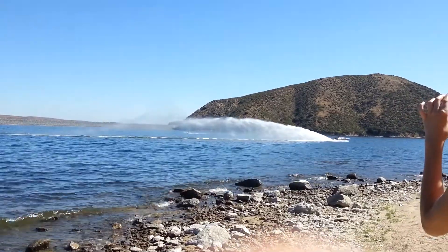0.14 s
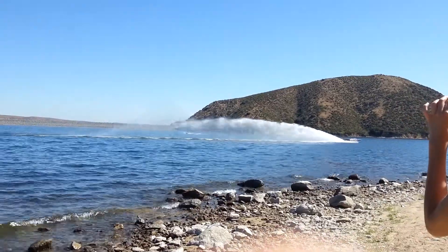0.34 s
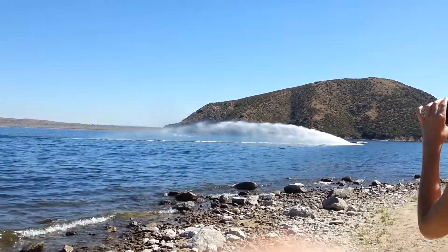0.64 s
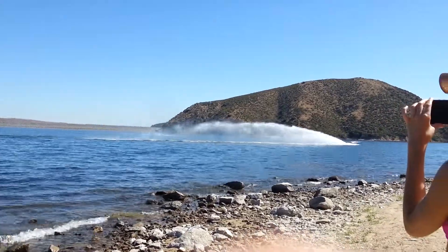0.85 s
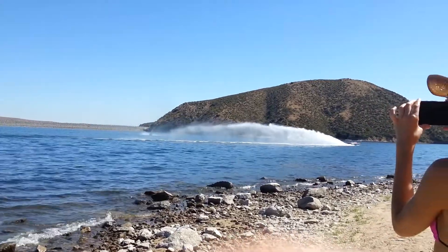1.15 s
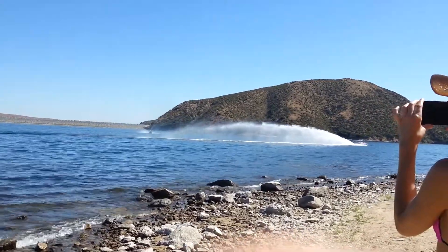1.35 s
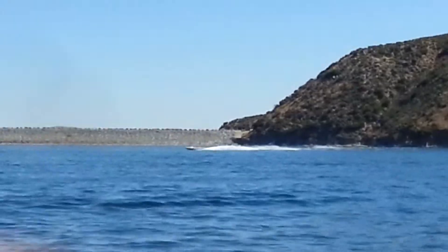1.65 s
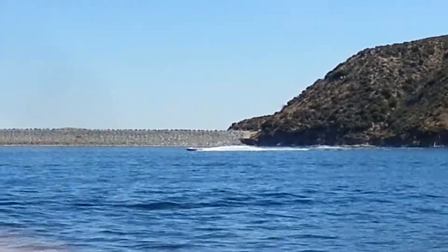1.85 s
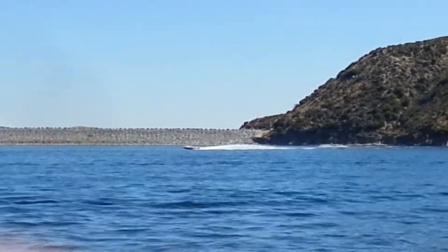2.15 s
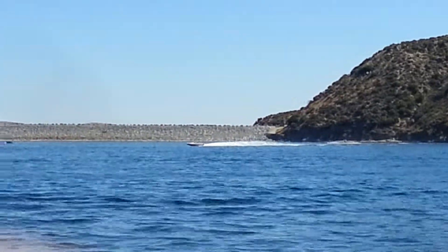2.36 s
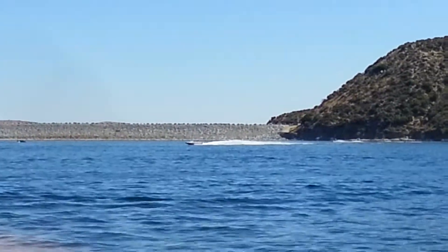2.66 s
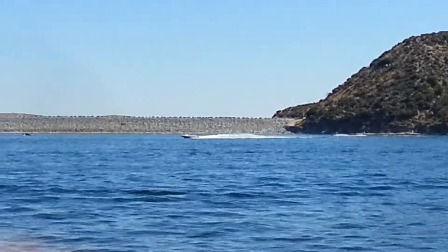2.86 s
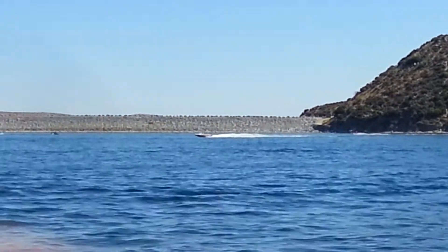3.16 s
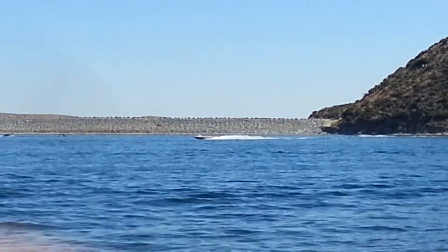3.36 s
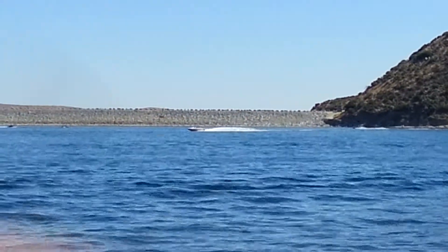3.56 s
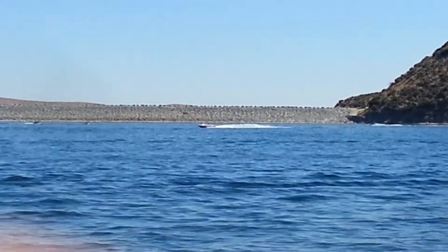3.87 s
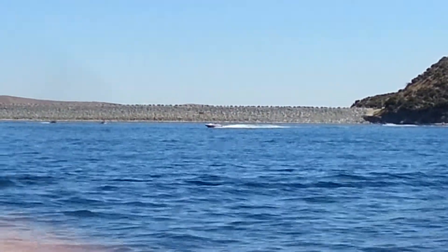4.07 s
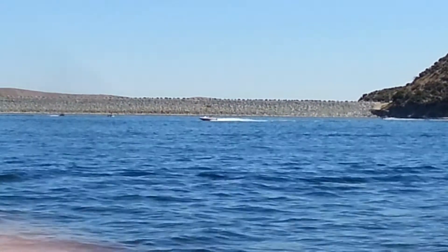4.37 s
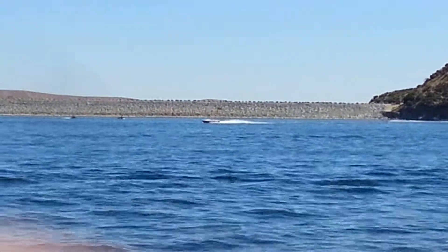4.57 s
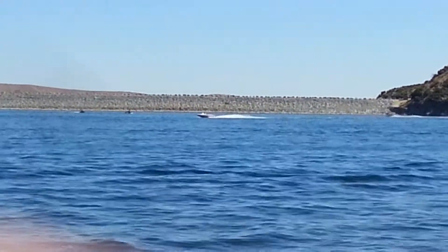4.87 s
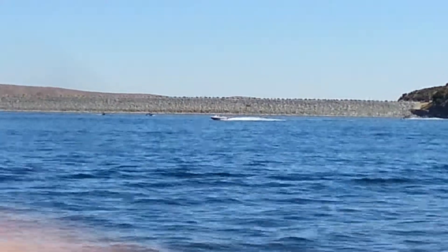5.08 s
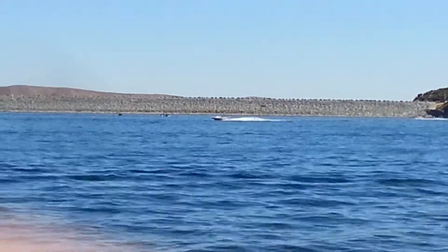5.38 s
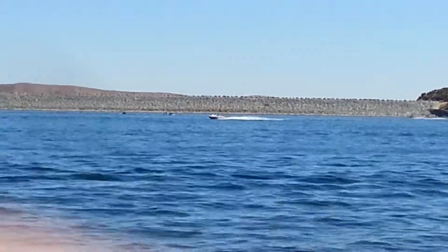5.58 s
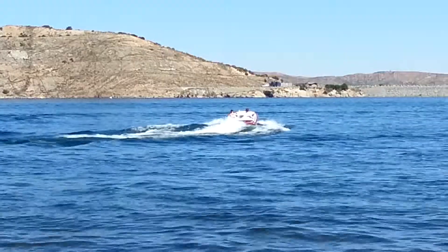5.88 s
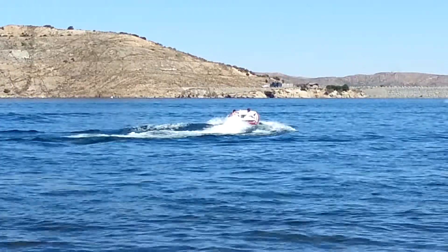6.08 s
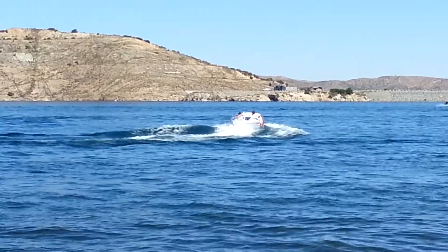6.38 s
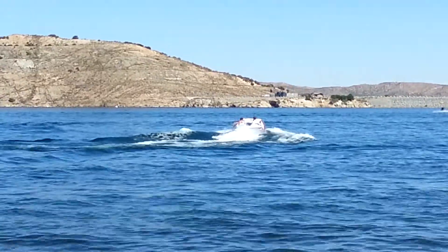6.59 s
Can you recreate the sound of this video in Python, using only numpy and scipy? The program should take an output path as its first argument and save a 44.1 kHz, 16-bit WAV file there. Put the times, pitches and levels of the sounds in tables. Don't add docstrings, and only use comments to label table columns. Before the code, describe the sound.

Outdoors on a pebbly lake shore, a V8 jet boat turns close by with a loud, steady, wavering drone, rushing water and short rasps. A hard cut drops to a much quieter distant run that throttles back and fades beneath small wavelets, drips and another engine idling. Another cut brings back a loud, lower, pulsing engine nearby. Stereo handheld microphone, treble slightly thinned.

```python
import sys
import numpy as np
from scipy import signal
from scipy.fft import rfft, irfft, next_fast_len
from scipy.io import wavfile
from scipy.ndimage import uniform_filter1d, map_coordinates

SR = 44100
rng = np.random.default_rng(int(sys.argv[2]) if len(sys.argv) > 2 else 0)


def digitize_waveform(pressure):
    field = np.atleast_2d(pressure).T
    bounded = np.clip(field, -1, 1)
    quanta = np.round(bounded * 32767).astype(np.int16)
    wavfile.write(sys.argv[1], SR, quanta)


def voltage_ratio(level):
    return 10 ** (np.asarray(level, float) / 20)


N = 296793

CUTS = [0, 1.5037, 5.7272, 7]

# time_s, cycle_hz
TURN_SPEED = [
    (0, 34.32),
    (.2, 34.075),
    (.45, 33.91),
    (.75, 33.855),
    (1.2, 33.815),
    (1.51, 33.69),
]
# time_s, thump_db, drone_db
TURN_LEVELS = [
    (0.02, -10, -20),
    (0.334, -10, -17),
    (0.432, -14, -14),
    (0.87, -11, -16),
    (1.076, -13.5, -15.5),
    (1.132, -12.5, -16.5),
    (1.48, -13, -15),
    (1.49, -14, -13.5),
]
# time_s, cycle_hz, level_db
AWAY_RUN = [
    (1.5, 36.46, -34.5),
    (3.379, 36.73, -35.5),
    (3.501, 33.68, -33.5),
    (3.638, 28.92, -34),
    (4.05, 29.22, -33),
    (4.52, 29.38, -34),
    (4.6, 34.15, -32),
    (4.72, 41, -50),
    (4.85, 38.7, -66),
    (5.8, 42.8, -75),
]
# time_s, cycle_hz
NEAR_SPEED = [
    (5.727, 29.27),
    (5.95, 29.235),
    (6.2, 29.31),
    (6.45, 29.55),
    (6.73, 30.05),
]
TURN_BARK_DB = -33.5
NEAR_DB = -17, -11.5, -26
AWAY_THUMP_DB, POWER_DB, POWER_OFF_S = -2, 11.5, 3.49

# order_of_cycle_rate, level_db
TURN_ORDERS = [(1, -56), (2, -47), (3, -28), (4, -25), (5, 0), (6, -8), (7, -8), (8, -18), (9, -14),
               (10, -17), (11, -18), (12, -25), (13, -23), (14, -27), (15, -34), (16, -40), (17, -31),
               (18, -32), (19, -33), (20, -37), (21, -32), (22, -28), (23, -33), (24, -29), (25, -32),
               (26, -30), (27, -29), (28, -34), (29, -33), (30, -36), (31, -34), (32, -39), (33, -34)]
AWAY_ORDERS = [(1, -53), (2, -31), (3, -18), (4, -22), (5, 0), (6, -13), (7, -18), (8, -14), (9, -22),
               (10, -23), (11, -25), (12, -29), (13, -28), (14, -28), (15, -33), (16, -30), (17, -32),
               (18, -33)]
NEAR_ORDERS = [(1, -49), (2, -44), (3, -34), (4, -28), (5, -11), (6, -6), (7, -16), (8, 0), (9, -12),
               (10, -15), (11, -18), (12, -21), (13, -18), (14, -22), (15, -27), (16, -25), (17, -33),
               (18, -31), (19, -36), (20, -22), (21, -20), (22, -22), (23, -22), (24, -28), (25, -30),
               (26, -33), (27, -27), (28, -23), (29, -32), (30, -32), (31, -30), (32, -34), (33, -48)]
IDLE_ORDERS = [(1, -39), (2, -37), (3, -33), (4, -10), (5, -5), (6, -15), (7, -10), (8, -1), (9, -4),
               (10, -7), (11, -3), (12, -2), (13, -11), (14, -11), (15, -14), (16, -11)]
BARK_FROM = 15
# order_of_cycle_rate, change_db
COASTING = [(3, -4), (6, -1.5), (7, -5), (8, -1.5), (11, 6.5), (12, 5), (16, 3.5), (18, 10.5)]
# order_of_cycle_rate, change_db
CLOSING = [(14, 4), (17, -9), (19, 14), (24, 3), (25, 2), (26, 4), (27, 7), (29, -6), (30, -3), (33, -2)]
DULLING_DB = [2, 0, 2]

TURN_FIRING = [
    [(0.04, 0.86), (0.083, 0.86), (0.369, 0.41), (0.497, 1.0), (0.629, 0.94), (0.682, 0.55), (0.938, 0.7),
     (0.945, 0.29)],
    [(0.125, 0.95), (0.146, 0.76), (0.737, 1.0), (0.758, 0.87)],
]
AWAY_FIRING = [
    [(0.169, 0.56), (0.223, 0.77), (0.421, 1.0), (0.546, 0.4), (0.739, 0.35), (0.791, 0.65), (0.891, 0.54),
     (0.98, 0.95)],
    [(.42, 1), (.98, .9)],
]
NEAR_FIRING = [
    [(0.086, 0.51), (0.233, 0.5), (0.492, 0.57), (0.57, 0.92), (0.716, 0.99), (0.801, 0.41), (0.867, 0.76),
     (0.913, 1.0)],
    [(0.109, 0.92), (0.544, 1.0), (0.575, 0.56), (0.679, 0.68)],
]
IDLE_FIRING = [
    [(0, 1), (.3, .7), (.55, .9), (.8, .6)],
    [(0, 1)],
]
TURN_PUFFS = [(.10, 1), (.47, 0.5), (.6, .7), (.7, 0.8), (.8, 0.4), (.9, 1)]
NEAR_PUFFS = [(.01, .6), (.16, .75), (.27, 0.86), (.41, 0.66), (.535, 1), (.69, 0.17), (.9, 0.46)]

# start_level_db, slope_db_per_s
RUSH = [
    [(-21.5, -2.5), (-32, -0.5), (-46, 2)],
    [(-32, 0), (-39, 0), (-49, -0.5)],
    [(-26, 1), (-33.5, -0.5), (-46, -2)],
]
# freq_hz, level_db
TURN_ROAR = [(25, -70), (45, -35.1), (80, -13.7), (120, -12.4), (170, -5.4), (240, -0.1), (340, -8.6),
             (470, -14), (545, -22), (620, -17), (700, -15.9), (900, -15.5), (1200, -19.7), (1600, -23.0),
             (2400, -70), (4000, -120)]
AWAY_ROAR = [(25, -73), (45, -77), (80, -14.5), (120, -17), (170, -2), (240, -7.5), (340, -11),
             (480, -13.5), (560, -13.5), (700, -13), (900, -12.5), (1200, -15), (1600, -22), (2400, -75),
             (4000, -120)]
NEAR_ROAR = [(25, -70), (45, -40.3), (80, -24.4), (120, -13.6), (170, -5.9), (240, -0.9), (340, -8.7),
             (480, -13.8), (560, -11.6), (700, -13.5), (900, -20.5), (1200, -26.8), (1600, -25.5),
             (2400, -70), (4000, -120)]
# freq_hz, level_db
SPRAY = [
    [(710, -47), (1200, -7.5), (1340, -14.5), (1910, -10.5), (2190, -11), (2650, -12), (3050, -10),
     (3320, -11), (4470, -14), (6500, -30), (8450, -63), (14300, -120)],
    [(710, -46), (1200, -5.5), (1760, -4), (2760, -7), (3610, -9.5), (4410, -8.5), (5520, -19.5),
     (6500, -23), (8450, -75), (14300, -120)],
    [(710, -17), (1200, -5), (1300, -28), (1370, -3.5), (1530, -12.5), (1940, -3), (2380, -9.5), (2570, -3),
     (2940, -13), (3210, -2), (3490, -13), (3910, -6), (6500, -27), (8450, -41), (14300, -120)],
]
# freq_hz, level_db
FIZZ = [
    [(3240, -37.5), (5500, -7.5), (6380, -5), (9550, -9), (14400, -25.5)],
    [(3240, -44), (5500, -6.5), (7000, 3), (12300, -2), (13900, -4.5), (14600, -10)],
    [(3240, -32), (5500, -9.5), (8160, -9), (9280, -13), (10100, -15), (10900, -15), (14400, -26.5)],
]
# time_s, level_db, half_length_s, pitch_hz, width_hz
RASP = [
    [(.03, -35.5, 0.055, 1370, 150), (.2, -44, .08, 1160, 70), (.385, -30.5, 0.04, 745, 35),
     (.42, -40.5, 0.17, 3020, 220), (.56, -36, .09, 790, 90), (.8, -39, 0.087, 910, 60),
     (1.17, -30, 0.067, 915, 50), (1.2, -37, .04, 650, 60), (.15, -44, .07, 930, 60),
     (.9, -40, 0.073, 2950, 250), (1.25, -42, 0.14, 3000, 250), (1.42, -32.5, 0.13, 814, 80)],
    [(2.17, -46, 0.074, 850, 34), (1.45, -37, 1, 750, 26), (3.15, -38, 0.054, 730, 60),
     (4, -40, 0.74, 770, 45), (2.4, -41, 0.023, 2650, 200), (2.7, -42, 0.031, 2550, 250),
     (2.75, -51, 0.22, 2700, 69), (2.55, -52, .35, 4400, 120), (3.17, -49, .06, 4450, 150)],
    [(5.93, -36.5, 0.1, 1960, 220), (6.07, -34, 0.04, 1950, 150), (6.27, -44, 0.053, 3180, 90),
     (6.35, -51, 0.04, 2620, 120), (6.48, -39.5, 0.08, 1780, 90), (6.5, -39.5, .06, 2130, 90),
     (6.63, -34.5, 0.055, 2090, 180), (6.695, -30, 0.028, 1930, 250), (6.72, -35, 0.03, 3280, 100),
     (6.46, -45, .06, 3130, 90), (6.62, -39, .08, 3160, 100), (6.67, -38, .05, 2650, 200),
     (6.5, -32.5, 0.27, 680, 140), (6.7, -37, 0.15, 2480, 800)],
]
SPRAY_BEAT = 0.42
SPRAY_AIM_DB = 1.5

# freq_hz, likeness_0_to_1
ALIKE = [
    [(130, 0.97), (300, 0.97), (620, 0.75), (850, .8), (1200, .6), (1700, 0.2), (2400, .45), (4700, 0.33),
     (8000, 0.1)],
    [(130, 1), (300, .97), (600, 0.82), (1200, 0.6), (2400, 0.62), (3400, .4), (6000, .17), (9000, 0.03)],
    [(130, .998), (300, 0.95), (620, 0.6), (1200, .25), (2400, 0.88), (4700, .7), (9000, .2), (14000, .1)],
]
LEFT_LATE = [-0.000067, 0.00034, .00001]
# freq_hz, left_minus_right_db
LEAN = [
    [(600, 1), (1700, -2), (2400, 1.5), (3400, 1.5), (6800, 0), (12000, -9)],
    [(600, -0.5), (1200, 1), (2400, 4), (3400, 0.5), (6800, -4), (9500, -8), (12500, 0)],
    [(600, 1.5), (1200, -1.5), (2400, -2.5), (4700, -0.5), (6800, -4.5), (12500, -0.5)],
]
# left_minus_right_db, left_late_s
EXHAUST_SIDE = [
    (.3, -.00006),
    (-.2, .00012),
    (0, .00005),
]
# freq_hz, left_minus_right_db
PORTS = [(60, -0.5), (130, 0), (280, 0.64), (620, 0), (14000, 1)]

# time_s, peak_db, pitch_hz, left_minus_right_db
TICKS = [(0.0442, -25, 9300, -4), (.2663, -39, 7000, -3), (.9428, -29, 6000, -3), (1.3952, -38, 6840, -1),
         (5.7902, -35, 6690, -2), (1.5030, -33, 9500, 0), (1.5499, -35, 6370, -9), (1.7993, -34.5, 5810, 0),
         (4.4862, -33, 5200, -6), (5.0828, -32, 7700, -9.5), (6.0621, -42, 6120, -4),
         (6.1449, -30, 7860, -5)]
# time_s, peak_db, pitch_hz, left_minus_right_db
DRIPS = [
    (1.690, -30, 2800, 11),
    (2.486, -27, 3340, 7),
    (3.142, -25, 4460, 0),
    (3.178, -35, 4350, 0),
    (3.170, -27, 4800, -6),
    (3.543, -28, 2500, 1.5),
    (4.428, -24.5, 2670, 1.5),
    (4.499, -34, 2507, 0),
    (4.56, -31, 1310, 5.5),
    (4.585, -30, 1320, 7),
]
# time_s, level_db
WASH = [
    (1.52, -44),
    (1.59, -50.5),
    (2.06, -50.5),
    (2.24, -46.5),
    (3.2, -46.5),
    (3.23, -49),
    (3.95, -47),
    (4.24, -53.5),
    (4.67, -44.5),
    (5.71, -41.5),
]
WASH_GROWS = 0.13, 0.52, 0.61

# time_s, level_db
IDLE = [
    (1.5, -36),
    (2.3, -35.5),
    (4.1, -41.5),
    (4.7, -34.5),
    (5.8, -35),
]
# time_s, level_db, half_length_s
HUM = [
    (1.85, -37, 0.16),
    (3.4, -35, 0.067),
    (3.62, -35, 0.14),
    (4.2, -33.5, 0.096),
    (4.5, -37, 0.06),
    (5.1, -48, 0.23),
    (5.6, -32, 0.16),
]
IDLE_HZ, IDLE_THUMP_DB, IDLE_BARK_DB = 21.5, -10.5, -13.5
HUM_HZ, HUM_DB = 264, -46.5

# freq_hz, floor_db
GATE = [(7500, -120), (9000, -92), (11000, -86.5), (14500, -89)]
GATE_FOLLOWS, GATE_REST_DB = .8, -24
GATE_SCATTER_DB = 5.5

EAR = np.array([[.5], [-.5]])


def unit(x):
    return x / np.sqrt(np.mean(x ** 2) + 1e-20)


def along(points, hz):
    f, v = np.transpose(points)
    return np.interp(np.log(hz + 1), np.log(f + 1), v)


def curves(rows):
    s, *cols = np.transpose(rows)
    return [np.interp(np.arange(N) / SR, s, c) for c in cols]


def steady(*levels_db):
    return [np.full(N, float(db)) for db in levels_db]


def wobble(rate, size=N):
    knots = rng.standard_normal(int(size * rate / SR) + 4)
    return map_coordinates(knots, [np.arange(size) * rate / SR])


def swells(rows):
    t = np.arange(N) / SR
    return np.sqrt(sum(voltage_ratio(db) ** 2 * np.exp(-((t - s) / length) ** 2) for s, db, length in rows))


def filtered(x, response):
    m = next_fast_len(N + 8192)
    return irfft(rfft(x, m) * response(np.fft.rfftfreq(m, 1 / SR)), m)[..., :N]


def smooth_patches(shape, bins, frames):
    field = uniform_filter1d(rng.standard_normal(shape), bins, axis=0)
    return unit(uniform_filter1d(field, frames, axis=1))


def view(index):
    return slice(round(CUTS[index] * SR), min(N, round(CUTS[index + 1] * SR)))


def exhaust(index, run, orders, firing, count, rough, flutter, coasting=(), shift=0):
    span = view(index)
    hz, *levels_db = (c[span] for c in run)
    size = len(hz)
    cycle = 2 * np.pi * np.cumsum(hz) / SR
    swing = DULLING_DB[index] * (np.arange(size) - size / 2) / SR
    layers = np.zeros((3, size))
    change_db = {round(k): db for k, db in coasting}
    for k, db in orders:
        db = db + change_db.get(k, 0) * shift
        place, strength = np.transpose(firing[int(k >= BARK_FROM)])
        pulses = 1j * np.sum(strength * np.exp(-2j * np.pi * k * place))
        shake = rough * np.minimum((k / 5) ** 2.0, 3)
        drift = wobble(flutter, size) + 1j * wobble(flutter, size)
        tone = np.real((1 + shake * drift) * np.exp(1j * (k * cycle + np.angle(pulses))))
        if count < k < BARK_FROM:
            db = db - swing * np.clip(k - 8, -1.5, 3)
        layers[int(k > count) + int(k >= BARK_FROM)] += voltage_ratio(db) * tone
    throb = np.zeros(size)
    for pulses in firing[2:] or firing:
        for place, strength in pulses:
            throb += strength ** 2 * np.exp(30 * (np.cos(cycle - 2 * np.pi * place + .1) - 1))
    sound = sum(voltage_ratio(db) * unit(x) for db, x in zip(levels_db, layers))
    return sound, throb / throb.mean()


def rush(spectrum, index, patchy_db):
    z = signal.stft(rng.standard_normal((2, N)), nperseg=512)[2]
    gain = voltage_ratio(patchy_db * smooth_patches(z.shape[1:], bins=5, frames=8))
    pair = signal.istft(z * gain, nperseg=512)[1][:, :N]

    def colour(hz):
        turn = np.arccos(np.clip(along(ALIKE[index], hz), -1, 1)) / 2
        return voltage_ratio(along(spectrum, hz)) * [np.cos(turn), np.sin(turn)]

    def bearing(hz):
        late = np.exp(-2j * np.pi * hz * LEFT_LATE[index] * EAR)
        return late * voltage_ratio(along(LEAN[index], hz) * EAR * 1)

    mid, side = filtered(pair, colour)
    return unit(filtered(np.array([mid + side, mid - side]), bearing))


def rasp(index):
    band = [(300, -120), (500, 0), (4500, 0), (6000, -120)]
    hz, t, z = signal.stft(rush(band, index, patchy_db=2.5), SR, nperseg=1024)
    power = 0
    for s, db, length, centre, width in RASP[index]:
        resonance = np.exp(-((hz - centre) / width) ** 2) * 2300 / width
        power = power + voltage_ratio(db) ** 2 * np.outer(resonance, np.exp(-((t - s) / length) ** 2))
    return signal.istft(z * np.sqrt(power), SR, nperseg=1024)[1][:, :N]


def boat(index, engine, beat, patchy_db):
    sound, throb = engine
    span = view(index)
    wash_db = curves(WASH)[0][span]
    wash_db = (wash_db - wash_db.mean()) * (index == 1)
    since = np.arange(len(sound)) / SR
    roar_db, spray_db, fizz_db = (db + slope * since + grows * wash_db
                                  for (db, slope), grows in zip(RUSH[index], WASH_GROWS))
    aim = swells([row[:3] for row in RASP[index]])[span]
    spray_db = spray_db + SPRAY_AIM_DB * aim / aim.max()

    pan_db, late = EXHAUST_SIDE[index]
    sound = voltage_ratio(pan_db * EAR) * (sound - EAR * late * SR * np.gradient(sound))

    gate = np.sqrt(1 - beat + beat * throb)
    roar_colour = [TURN_ROAR, AWAY_ROAR, NEAR_ROAR][index]
    roar = voltage_ratio(roar_db) * gate * rush(roar_colour, index, patchy_db)[:, span]
    spray = voltage_ratio(spray_db) * gate ** SPRAY_BEAT * rush(SPRAY[index], index, patchy_db)[:, span]
    fizz = voltage_ratio(fizz_db + 0.95 * wobble(14)[span]) * rush(FIZZ[index], index, 0.94)[:, span]
    return sound + roar + spray + fizz + gate * rasp(index)[:, span]


def rings(events, cycles, extra_db):
    out, t = np.zeros((2, N + SR)), np.arange(1200) / SR
    for s, db, hz, pan_db in events:
        ring = np.sin(2 * np.pi * hz * t * (1 + 8 * t))
        ring *= np.exp(-t * hz / cycles) * (1 - np.exp(-t * hz))
        out[:, round(s * SR):][:, :len(t)] += voltage_ratio(db + extra_db + pan_db * EAR) * ring
    return out[:, :N]


def trickle(count, level_db, spread_db, low_hz, cycles):
    when, size, pitch, side = rng.random((count, 4)).T
    peak_db = -spread_db * np.log(size + .08)
    rows = np.c_[when * N / SR, peak_db, low_hz * 3 ** pitch, 12 * side - 6]
    return rings(rows, cycles, level_db)


def throttle():
    return 1 / (1 + np.exp((np.arange(N) / SR - POWER_OFF_S) / 0.041))


def far_run():
    hz, db = curves(AWAY_RUN)
    return hz, db + AWAY_THUMP_DB + POWER_DB * throttle(), db, db - 16


def shore_engine():
    db, = curves(IDLE)
    run = [np.full(N, IDLE_HZ), db + IDLE_THUMP_DB, db, db + IDLE_BARK_DB]
    idle, _ = exhaust(1, run, IDLE_ORDERS, IDLE_FIRING, count=6, rough=.3, flutter=8)
    tone = np.sin(2 * np.pi * np.cumsum(HUM_HZ + 6 * wobble(12)) / SR)
    hum = (voltage_ratio(HUM_DB) + swells(HUM)) * voltage_ratio(3 * wobble(14)) * tone
    return idle + hum[view(1)]


def scene():
    turn_run = curves(TURN_SPEED) + curves(TURN_LEVELS) + steady(TURN_BARK_DB)
    turn = exhaust(0, turn_run, TURN_ORDERS, TURN_FIRING + [TURN_PUFFS], count=5, rough=.07, flutter=11)
    away = exhaust(1, far_run(), AWAY_ORDERS, AWAY_FIRING, count=5, rough=.08, flutter=9,
                   coasting=COASTING, shift=1 - throttle()[view(1)])
    near_run = curves(NEAR_SPEED) + steady(*NEAR_DB)
    near = exhaust(2, near_run, NEAR_ORDERS, NEAR_FIRING + [NEAR_PUFFS], count=6, rough=.024, flutter=5,
                   coasting=CLOSING, shift=np.linspace(-.6, .6, N - view(2).start))
    views = [boat(0, turn, beat=0.18, patchy_db=1.03),
             boat(1, away, beat=0.055, patchy_db=1.18) + shore_engine(),
             boat(2, near, beat=.55, patchy_db=1.5)]
    joins = np.round(np.array(CUTS[1:3] + [N / SR])[:, None] * SR)
    fade = np.minimum(1, np.abs(np.arange(N) - joins).min(axis=0) / 10)
    drops = trickle(count=700, level_db=-45, spread_db=1.8, low_hz=2200, cycles=3)
    drops += trickle(count=120, level_db=-40.0, spread_db=5.5, low_hz=4500, cycles=1.3)
    pebbles = rings(TICKS, cycles=1.35, extra_db=12.0)
    drips = rings(DRIPS, cycles=4.7, extra_db=1)
    return fade * np.concatenate(views, axis=1) + pebbles + drips + drops


def thinned(x):
    hz, _, z = signal.stft(x, SR, window="cosine", nperseg=2048)
    left_power = np.sum(np.abs(z[0]) ** 2, axis=0)
    loud_db = 10 * np.log10(uniform_filter1d(left_power, size=5) + 1e-9)
    scatter_db = GATE_SCATTER_DB * smooth_patches(z.shape[1:], bins=5, frames=2)
    floor = voltage_ratio(along(GATE, hz)[:, None] + scatter_db + GATE_FOLLOWS * (loud_db - GATE_REST_DB))
    line = uniform_filter1d(np.mean(np.abs(z) ** 2, axis=0), size=3, axis=0)
    return signal.istft(z * (line > floor ** 2), SR, window="cosine", nperseg=2048)[1][:, :N]


def top_cut(x):
    return signal.sosfilt(signal.butter(12, 14600, fs=SR, output="sos"), x)


def record(dry):
    ports = filtered(dry, lambda hz: voltage_ratio(along(PORTS, hz) * EAR) / (1 + (55 / (hz + 1)) ** 4))
    soft = ports / (1 + np.abs(ports / 1.6) ** 4) ** (1 / 4)
    mix = thinned(soft)
    return top_cut(mix)


dry = scene()
out = record(dry)
digitize_waveform(out)
```